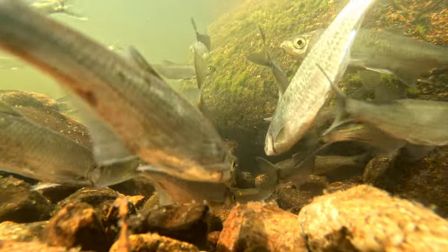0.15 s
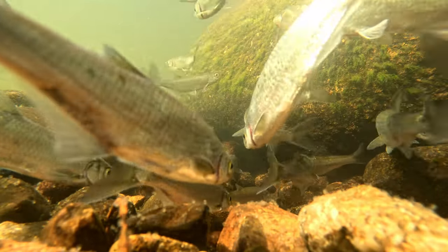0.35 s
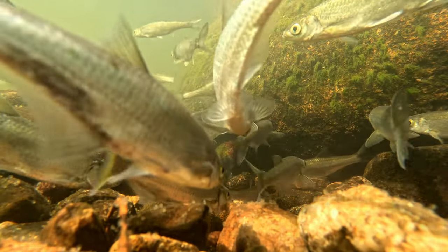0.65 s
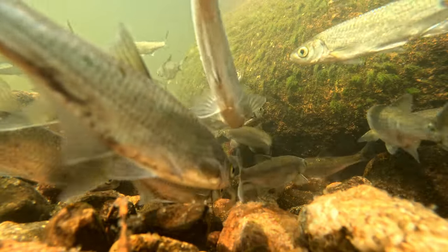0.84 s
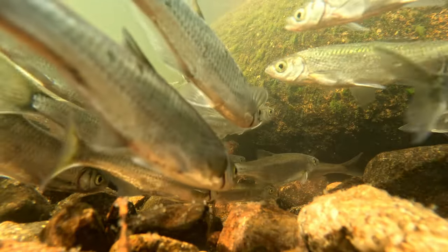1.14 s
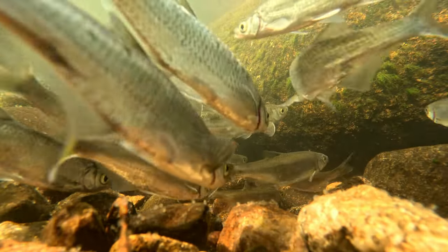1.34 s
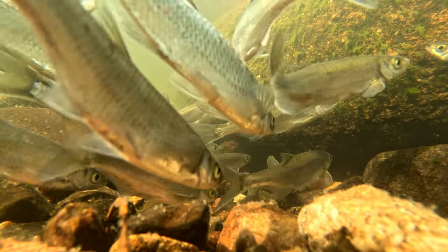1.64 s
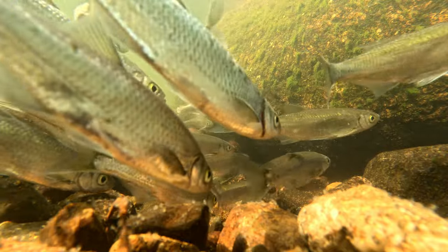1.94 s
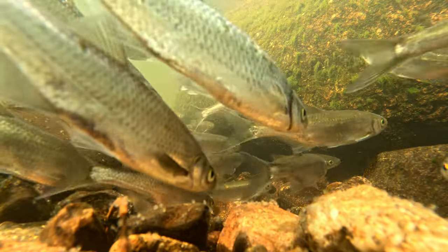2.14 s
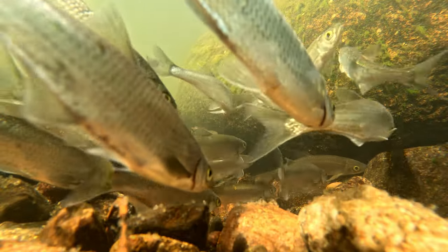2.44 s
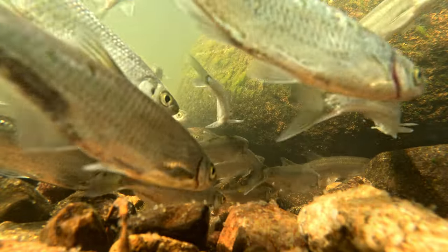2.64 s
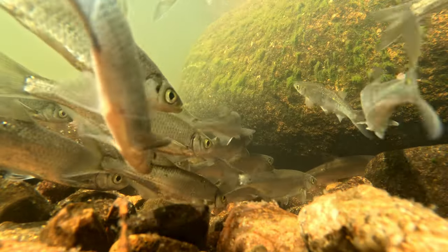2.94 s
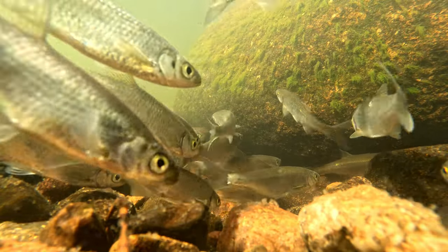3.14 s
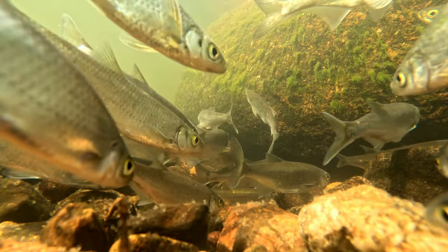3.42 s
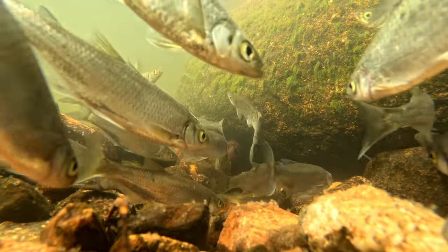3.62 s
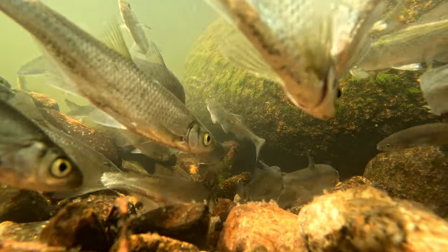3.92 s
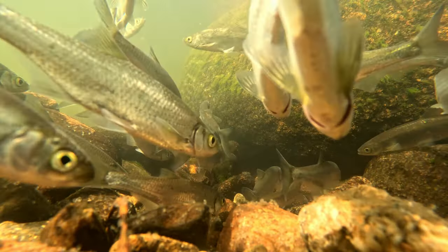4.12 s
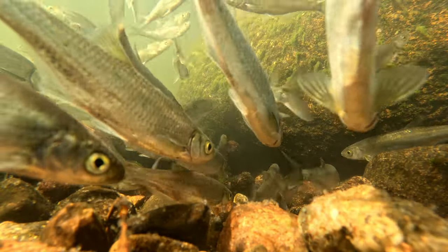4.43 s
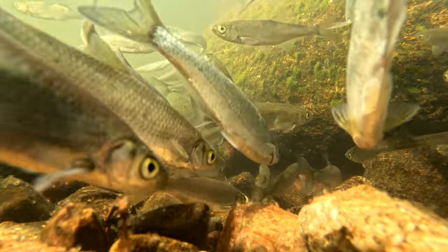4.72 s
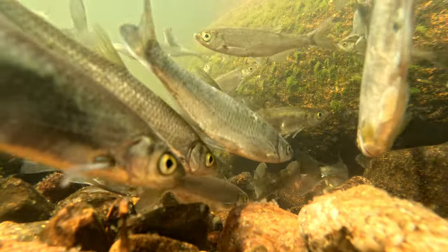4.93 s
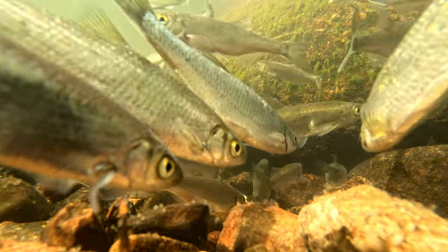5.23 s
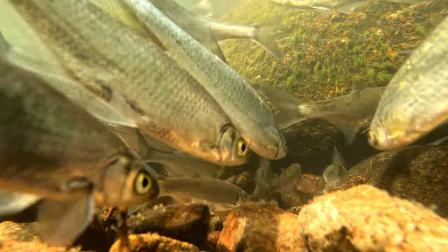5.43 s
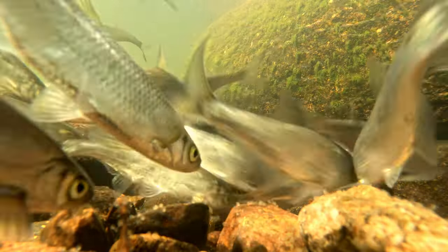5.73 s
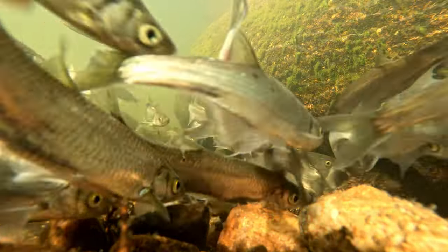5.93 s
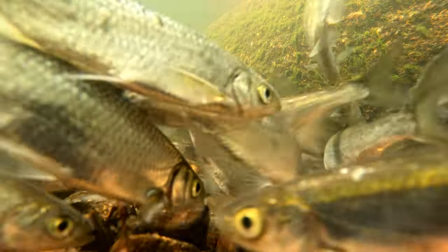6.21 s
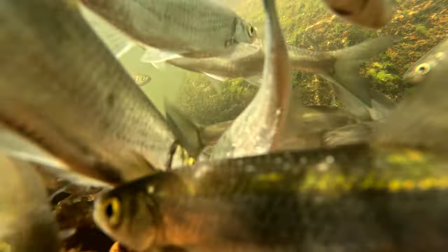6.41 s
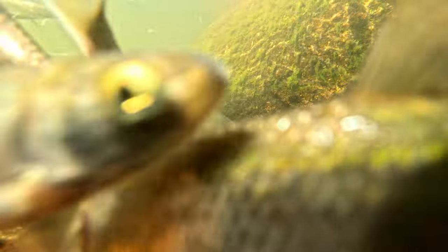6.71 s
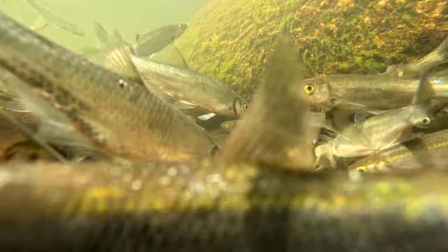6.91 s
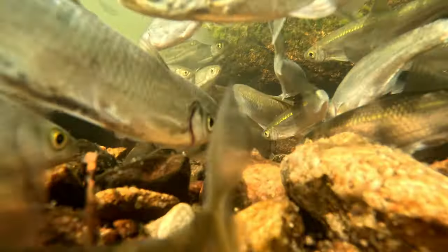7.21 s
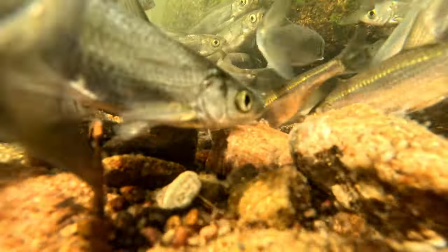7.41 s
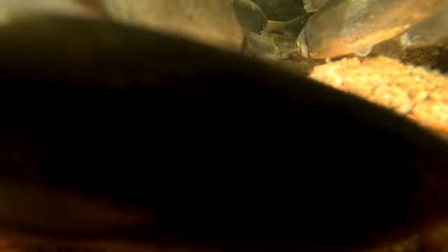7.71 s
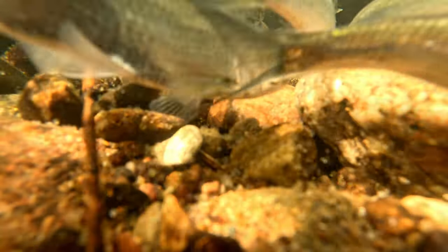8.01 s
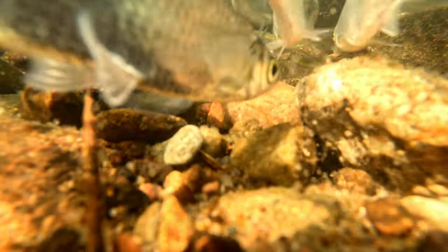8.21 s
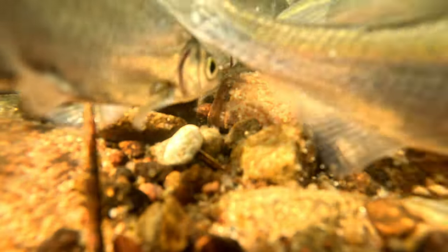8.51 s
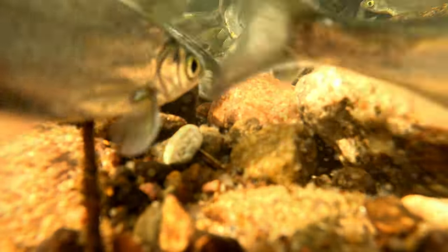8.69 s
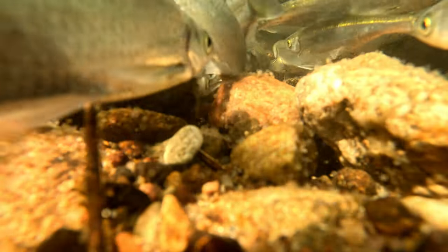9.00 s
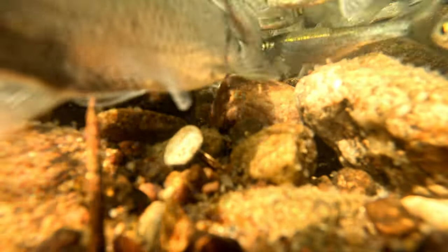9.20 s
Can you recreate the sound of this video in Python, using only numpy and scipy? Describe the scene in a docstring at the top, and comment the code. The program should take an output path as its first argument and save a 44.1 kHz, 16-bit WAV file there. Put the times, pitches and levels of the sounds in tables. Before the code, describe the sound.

Underwater, muffled bumps and soft rubs over a low hum build into a crowded burst of heavy thuds, scrapes and gritty clicks against a small housing.

```python
"""Underwater camera among fish

A small camera lies on a stony river bed among a shoal of fish. Current and passing bodies press on its
housing as slow random pressure and short swings; fins and grit rub and knock it, exciting its resonances.
Bright ticks, one bubble gurgle, a low hum, a faint picture-rate buzz and a river hiss complete the scene.
The loudest blows overload the input, and a quick limiter holds the peaks.
"""
import sys
import numpy as np
from scipy import signal
from scipy.fft import rfft, irfft, next_fast_len
from scipy.io import wavfile
from scipy.ndimage import uniform_filter1d, minimum_filter1d, map_coordinates

SR = 44100
rng = np.random.default_rng(int(sys.argv[2]) if len(sys.argv) > 2 else 0)


def dump(signal):
    """Clip the signal to [-1, 1] and save it as 16-bit WAV at the path in sys.argv[1]."""
    limited = np.clip(np.atleast_2d(signal).T, -1, 1)
    pcm = np.round(limited * 32767).astype(np.int16)
    wavfile.write(sys.argv[1], SR, pcm)


N = 412335

# housing resonances, which act twice: [f/Hz, width/Hz, level per pass/dB]
LID = [(577, 150.2, 7), (278, 139, -6)]
WINDOW = [(1678, 490, 2.5), (820, 1080, -3)]
FRAME = [(2582, 280, 10)]
RIM_MODES = [(3426, 1500, 3.5), (5300, 510, -4), (6940, 1400, 4)]
# vibrating parts, lid, window, frame and rim: [resonances, f/Hz above which the water damps the part]
PARTS = [(LID, 1950), (WINDOW, 2100), (FRAME, 3000), (RIM_MODES, 4300)]
FIRM_DB = -39  # frame level of a firm touch


def amp(db):
    """Level to amplitude: 20 dB is a factor of ten."""
    return 10 ** (np.asarray(db) / 20)


def unit(x):
    """Normalization to unit root-mean-square value."""
    return x / np.sqrt(np.mean(x ** 2) + 1e-20)


def along(points, hz):
    """Interpolation of each column after the frequency on a logarithmic frequency axis."""
    f, *columns = np.transpose(points)
    return [np.interp(np.log(hz + 1), np.log(f + 1), column) for column in columns]


def curves(rows):
    """Linear interpolation in time: one value per sample for each column after the time."""
    s, *columns = np.transpose(rows)
    return [np.interp(np.arange(N) / SR, s, column) for column in columns]


def wobble(rate):
    """Band-limited random modulation: a smooth curve through `rate` random knots a second."""
    knots = rng.standard_normal(int(N * rate / SR) + 4)
    return map_coordinates(knots, [np.arange(N) * rate / SR])


def filtered(x, response):
    """Linear filtering: the spectrum of x, mirrored past its end, times a response of frequency."""
    m = next_fast_len(N + SR // 2)
    longer = np.concatenate([x, x[..., -2:-SR // 10:-1]], axis=-1)
    spectrum = rfft(longer, m) * response(np.fft.rfftfreq(m, 1 / SR))
    return irfft(spectrum, m)[..., :N]


def ringing(x, modes, dull_hz, tuning=1):
    """Modal superposition, passed twice (wall, then air space) and damped above dull_hz."""
    def bank(f):
        total = 0
        for k, (centre, width, db) in enumerate(modes):
            damping = 1j * f * width
            mode = damping / ((centre * tuning) ** 2 - f * f + damping)
            # alternate signs fill the gaps between neighbouring resonances
            total = total + (-1) ** k * amp(db) * mode
        return total

    def response(f):
        water_loss = (1 + np.sqrt(2) * 1j * f / dull_hz - (f / dull_hz) ** 2) ** 3
        return bank(f) ** 2 / water_loss

    # white noise keeps its level
    mean_gain = np.sqrt(np.mean(np.abs(response(np.arange(0, SR / 2, 10))) ** 2))
    return filtered(x, response) / mean_gain


def with_rim(part_db):
    """Level-dependent brightness: the rim follows the frame, gaining more in harder contact."""
    below_frame_db, growth = -7, .26  # growth in dB per dB above a firm touch
    rim_db = part_db[2] + below_frame_db + growth * (part_db[2] - FIRM_DB)
    return amp([*part_db, rim_db])


def housing():
    """Forced modal vibration: knocks and rubbing ring each part, its tuning shifting with the place touched."""
    shift, shifts_per_s = .038, 14  # fraction of each resonance frequency; random knots per second
    sound = 0
    for part, blow, rub in zip(PARTS, knocks(), rubbing()):
        force = blow + rub
        high = .5 + .5 * np.tanh(3.1 * wobble(shifts_per_s))
        sound = sound + ringing(high * force, *part, 1 + shift)
        sound = sound + ringing((1 - high) * force, *part, 1 - shift)
    return sound


def knocks():
    """Impact excitation: each knock is a decaying, slightly cushioned burst of contact force on every part."""
    # knocks, rated by the force on each part: [t/s, lid level/dB, window level/dB, frame level/dB]
    knock_rows = [(0.748, -22.5, -65, -75), (0.808, -16.5, -36, -55), (0.842, -15, -23, -56.5),
                  (1.572, -24.5, -27.5, -60), (1.62, -20.5, -43, -65), (1.784, -16.5, -26.5, -53.5),
                  (2.424, -21, -25, -47), (2.568, -32.5, -36.5, -77), (2.749, -3, -17, -38),
                  (3.119, -24.5, -31, -65), (3.812, -38, -43, -82), (3.83, -38, -46, -67),
                  (3.856, -27.5, -40.5, -71), (4.928, -16.5, -36.5, -74), (5.03, -30.5, -36.5, -76),
                  (5.068, -32, -47.5, -85), (5.092, -35.5, -36, -79), (5.112, -18.5, -50.5, -71),
                  (5.391, -3.5, -28.5, -65.5), (5.435, -1.5, -23, -82), (5.669, -6, -30.5, -73),
                  (5.804, -11, -30.5, -41.5), (5.896, -8.5, -31.5, -54), (5.911, -10.5, -36.5, -47),
                  (6.008, -18, -32.5, -62), (6.022, -4, -33, -62), (6.039, -4.5, -34.5, -59),
                  (6.041, -4.5, -31, -55.5), (6.067, -9, -34, -50), (6.132, -3.5, -28.5, -74),
                  (6.217, -0.5, -11, -64), (6.239, -8, -13.5, -46), (6.285, -3.5, -32.5, -70),
                  (6.322, -7.5, -21, -74), (6.365, -2, -17, -64), (6.456, -9, -51.5, -66),
                  (6.539, -20, -24.5, -68), (6.657, -2, -9.5, -40), (6.796, -13.5, -15, -39),
                  (6.823, 0.5, -0.5, -29), (6.847, -12.5, -10, -24), (6.855, -21, -13.5, -32),
                  (6.858, -20.5, -7, -31.5), (6.923, -7.5, -19.5, -21), (6.939, -10, -23.5, -34),
                  (6.966, -9.5, -15.5, -41), (6.991, -15.5, -12.5, -35.5), (7.035, -22.5, -14, -27.5),
                  (7.063, -18.5, -26, -50.5), (7.118, -24, -12.5, -35.5), (7.135, -15.5, -18, -56.5),
                  (7.164, -11, -26, -35.5), (7.186, -18.5, -17, -27), (7.248, -19.5, -28, -34),
                  (7.293, -8, -25, -38), (7.357, -1.5, -11.5, -15.5), (7.378, -15.5, -23.5, -36),
                  (7.411, -4, -37, -44), (7.46, -12.5, -24.5, -46), (7.49, -28, -26.5, -41),
                  (7.499, -12.5, -15.5, -24.5), (7.53, -25, -31.5, -41), (7.534, -15, -19.5, -35),
                  (7.546, -14, -21.5, -29.5), (7.565, -11.5, -24.5, -37), (7.579, -23, -24, -36),
                  (7.602, -14, -11.5, -31), (7.621, -22.5, -21.5, -44), (7.629, -28.5, -37, -45),
                  (7.653, 1, -22.5, -39.5), (7.667, -19.5, -18, -39), (7.68, -5.5, -20, -37),
                  (7.726, -29, -35.5, -47), (7.742, -27, -31, -53), (7.772, 9.5, -17, -24.5),
                  (7.816, -23.5, -33.5, -54), (7.855, -18, -22, -39), (7.875, -36, -30, -48),
                  (7.885, -28, -27, -49), (7.897, -20.5, -45, -48), (7.915, -21, -26.5, -41),
                  (7.937, -19.5, -30.5, -43), (8.012, -19, -35.5, -57), (8.072, -32, -45, -49.5),
                  (8.186, -26.5, -20, -31.5), (8.231, -16.5, -27.5, -43), (8.306, -8, -27.5, -50),
                  (8.354, -12.5, -52, -62), (8.398, -16.5, -31.5, -63), (8.439, -15.5, -21, -32.5),
                  (8.455, -14.5, -28.5, -46), (8.467, -19, -28, -42), (8.477, -15, -19.5, -34.5),
                  (8.509, -29, -30, -40.5), (8.565, -31.5, -33, -63), (8.727, -7.5, -32, -56.5),
                  (8.918, -6.5, -14.5, -52), (9.098, -19, -23.5, -44.5), (9.119, -23.5, -22, -42),
                  (9.136, -22, -24.5, -44), (9.164, -11.5, -23, -54)]
    contact_t60_s, level_span_s = .012, .0071  # decay; time over which a knock's level is taken
    bite_s = .0012  # from first touch to the hardest instant
    t = np.arange(SR // 50) / SR
    blows = np.zeros((len(PARTS), 2, N + len(t)))
    for s, *part_db in knock_rows:
        contact = rng.standard_normal((2, len(t))) * amp(-60 * t / contact_t60_s)
        contact[:, round(bite_s * SR)] = [8, 3]
        force = contact / np.linalg.norm(contact[0])
        start = round(s * SR)
        blows[..., start:start + len(t)] += with_rim(part_db)[:, None, None] * force
    cushioned = uniform_filter1d(blows[..., :N], size=5)
    return cushioned * np.sqrt(level_span_s * SR)


def rubbing():
    """Friction excitation: fins and grit drag in uneven clumps; light strokes swish, firm ones crackle."""
    grit_growth = .2  # dB of grains per dB of frame level above a firm touch
    grains, drag = grit(rate=190, spread_db=5.5, flutter_db=2.2)
    strengths = strokes()
    gritty = (strengths[2] / amp(FIRM_DB)) ** grit_growth
    forces = []
    for strength, drag_db in zip(strengths, (2.5, -4.0, -2.5, -5.0)):
        mix = gritty * unit(grains) + amp(drag_db) * unit(drag)
        mix = mix / np.hypot(gritty, amp(drag_db))
        forces.append(strength * unit(amp(1.5 * wobble(45)) * mix))
    return forces


def grit(rate, spread_db, flutter_db):
    """Random impulse (shot) noise of uneven grains, and smooth drag noise, fluttering together; two rows each."""
    size = amp(spread_db * np.minimum(rng.exponential(size=(2, N)), 2.5))
    grains = (rng.random((2, N)) < rate / SR) * size * rng.choice([-1, 1], (2, N))
    flutter = amp(flutter_db * (wobble(30) + wobble(80)))
    return flutter * np.array([unit(grains), rng.standard_normal((2, N))])


def strokes():
    """Power addition of independent sources: each stroke swells, holds and dies away over constant silt."""
    # strokes of fins and grit: [t/s, length/s, lid level/dB, window level/dB, frame level/dB]
    stroke_rows = [(0.209, 0.013, -40.5, -47, -73), (0.575, 0.023, -52.5, -49, -63),
                   (0.676, 0.11, -38.5, -66, -73), (0.78, 0.026, -26.5, -41, -74),
                   (1.584, 0.07, -30, -51.5, -68), (1.751, 0.011, -22, -32.5, -56),
                   (2.377, 0.035, -32.5, -65.5, -78), (2.552, 0.041, -27.5, -44, -65),
                   (2.703, 0.11, -24.5, -35.5, -64), (2.767, 0.12, -19, -42, -78),
                   (2.854, 0.13, -14.5, -36, -80), (2.985, 0.018, -23.5, -35, -51),
                   (2.99, 0.064, -22.5, -45, -73), (3.124, 0.062, -15.5, -36, -78),
                   (3.3, 0.086, -24, -40.5, -82), (3.425, 0.13, -19.5, -37.5, -79),
                   (3.79, 0.054, -31, -43.5, -72), (3.868, 0.11, -38.5, -50, -72.5),
                   (3.978, 0.11, -31, -47.5, -64), (4.16, 0.156, -40, -53.5, -68),
                   (4.324, 0.038, -18.5, -36.5, -50.5), (4.493, 0.045, -26, -36, -55),
                   (4.56, 0.078, -41, -64, -82), (4.627, 0.02, -24.5, -46, -52.5),
                   (4.679, 0.09, -37.5, -54, -61.5), (4.906, 0.077, -30, -44, -55),
                   (5.012, 0.029, -32, -38.5, -74.0), (5.064, 0.05, -32, -53, -74),
                   (5.207, 0.066, -29, -38, -85), (5.352, 0.031, -32, -41, -80.5),
                   (5.42, 0.076, -29, -45, -94), (5.514, 0.32, -30.5, -46, -87),
                   (5.745, 0.095, -8, -34, -75.5), (5.87, 0.15, -9.5, -32, -66.5),
                   (6.07, 0.1, -19.5, -41, -86), (6.18, 0.16, -17, -39.5, -72),
                   (6.381, 0.27, -22.5, -43, -94), (6.502, 0.092, -16.5, -34.5, -60),
                   (6.595, 0.064, -12.5, -33.5, -54.5), (6.702, 0.15, -28, -36, -79),
                   (6.775, 0.048, -24, -23.5, -47), (6.829, 0.052, -21.5, -24.5, -34.5),
                   (6.888, 0.038, -25.5, -15, -28), (7.049, 0.088, -27, -26, -41.5),
                   (7.111, 0.06, -17.5, -25.5, -47), (7.171, 0.055, -16, -25.5, -37),
                   (7.236, 0.055, -9.5, -20, -38.5), (7.318, 0.069, -12.5, -26.5, -40),
                   (7.392, 0.067, -15, -30, -42), (7.509, 0.057, -23, -33, -46.5),
                   (7.553, 0.051, -19, -33, -50), (7.642, 0.093, -25, -36, -50.5),
                   (7.767, 0.057, -38.5, -52, -76), (7.863, 0.14, -30.5, -41.5, -58.5),
                   (7.953, 0.047, -18.5, -45.5, -64), (8.044, 0.088, -25.5, -43, -60.5),
                   (8.151, 0.097, -18.5, -41, -57), (8.265, 0.072, -12.5, -32.5, -49.5),
                   (8.371, 0.046, -22.5, -43.5, -59), (8.421, 0.14, -24.5, -42.5, -59),
                   (8.577, 0.1, -27.5, -48, -84), (8.673, 0.11, -21, -45, -73),
                   (8.799, 0.027, -18.5, -40, -50.5), (8.868, 0.055, -19, -41.5, -61),
                   (8.979, 0.05, -20, -36, -58.5), (9.047, 0.15, -11, -28.5, -49),
                   (9.212, 0.18, -13.5, -28.5, -49)]
    # silt drifting past all the time: [lid level/dB, window level/dB, frame level/dB]
    silt_db = (-44, -66, -81.5)
    attack_s, release_s = .016, .05
    t = np.arange(N) / SR
    power = with_rim(silt_db)[:, None] ** 2 * np.ones(N)
    for s, length, *part_db in stroke_rows:
        end = s + length + release_s
        near = slice(max(round(s * SR), 0), round(end * SR))
        rise, fall = (t[near] - s) / attack_s, (end - t[near]) / release_s
        shape = np.clip(np.minimum(rise, fall), 0, 1)
        power[:, near] += (with_rim(part_db)[:, None] * shape) ** 2
    return np.sqrt(power)


def shoves():
    """Transient pressure swings: bodies shove the housing, each wave packet rising faster than it fades."""
    # shoves and bumps: [t/s, envelope peak level/dB, f/Hz]
    shove_rows = [(0.713, -11, 84.8), (0.808, -10, 72.2), (0.858, -6.5, 140), (1.631, -9, 56.6),
                  (1.78, -12.5, 282), (1.788, -5.5, 44.2), (1.669, -15, 42.5), (1.823, -12.5, 44),
                  (2.207, -22, 60.3), (2.595, -15, 63.2), (2.745, -7.5, 315), (2.747, -3, 71.2),
                  (2.802, -8.5, 56.6), (3.001, -14, 61.5), (3.2, -16, 46.2), (4.414, -14, 51.2),
                  (4.66, -9.5, 81), (5.305, -13.5, 267), (5.408, -7, 82), (5.449, -4, 212.4),
                  (5.683, -10, 134.7), (5.765, -9, 360), (5.771, -3, 153.7), (6.033, -20.5, 136),
                  (6.042, -1.5, 333.5), (6.129, -8.5, 124.2), (6.224, -8.5, 96.2), (6.262, -2.5, 119.3),
                  (6.296, 0.5, 103.2), (6.376, -5, 139.2), (6.544, -9.5, 111.5), (6.648, -6, 94.4),
                  (6.663, 5.5, 349), (6.672, -2.5, 132.4), (6.824, -14, 83), (6.855, -10, 130),
                  (6.93, -19, 107), (6.967, 7, 350), (7.087, -6, 50.5), (7.124, -1.5, 322),
                  (7.301, -10.5, 98.3), (7.418, 3.5, 289), (7.61, -30.5, 155), (7.687, -1.5, 314),
                  (8.011, -7.5, 341), (8.211, -13, 122), (8.319, -9, 69.8), (8.727, -10.5, 89.6),
                  (8.851, -7.5, 349), (8.862, -11.5, 76.5), (8.946, -10.5, 98), (9.077, -9.5, 99.7),
                  (9.197, -8.5, 116)]
    t = np.arange(-SR // 20, SR // 10) / SR
    out = np.zeros((2, N + SR // 4))
    for s, db, hz in shove_rows:
        turns = hz * t
        life = np.where(t < 0, .055, .09) * np.sqrt(hz)  # in cycles: higher shoves swing more often
        swing = np.cos(2 * np.pi * (turns + rng.random())) * np.exp(-(turns / life) ** 2)
        start = round(s * SR) - SR // 20
        out[:, start:start + len(t)] += amp(db) * swing * [[1], [rng.standard_normal()]]
    return out[:, :N]


def surge():
    """Turbulent pressure fluctuation: current and the wash of passing fish press on the housing."""
    # low pressure of moving water: [t/s, level/dB]
    wash = [(0, -38.5), (.8, -28), (1.1, -38.5), (1.7, -31), (2.2, -34.5), (2.8, -30), (4.4, -30.5),
            (4.8, -31), (5.45, -25.5), (5.62, -43), (5.77, -10), (6.05, -12.5), (6.6, -17.5), (6.74, -26.5),
            (6.88, -7), (7.06, -20), (7.39, -11), (7.85, -22), (8.32, -17.5), (8.63, -28), (8.77, -13.5),
            (9.02, -16), (9.35, -15)]
    # spectral density of that pressure: [f/Hz, relative level/dB per Hz]
    push = [(8.8, -37.5), (15, 1.5), (54, 0), (141, -5), (222, -8.5), (400, -21), (520, -22.5), (880, -120)]
    noise = filtered(rng.standard_normal((2, N)), lambda hz: amp(along(push, hz)[0]))
    lumps = amp(3 * wobble(18))
    return amp(curves(wash)[0]) * unit(noise * lumps)


def ticks():
    """Broadband impact radiation: hard contact gives sharp, ragged noise bursts of a few milliseconds."""
    # thin bright ticks: [t/s, nominal level/dB]
    tick_rows = [(2.7524, -39.5), (5.804, -46), (5.899, -50), (6.008, -54.5), (6.0225, -52), (6.0385, -51),
                 (6.068, -45), (6.2163, -45.5), (6.2491, -48), (6.369, -49), (6.625, -48), (6.6588, -31),
                 (6.666, -30), (6.824, -29.5), (6.8302, -32.5), (6.847, -32), (6.861, -29), (6.8935, -38),
                 (6.923, -32.5), (6.964, -42.5), (7.1628, -45.5), (7.1868, -57), (7.3568, -24.5),
                 (7.6527, -37.5), (7.6804, -40.5), (8.0107, -50), (8.188, -51.5), (8.307, -47),
                 (8.4397, -49), (8.4771, -57), (9.195, -48.5)]
    # spectral colour of a tick: [f/Hz, relative level/dB per Hz]
    tick_colour = [(1200, -57.5), (2600, -3.5), (4500, -8), (7000, -10), (11000, -21.5), (16000, -40.5)]
    tick_t60_s = .0073
    colour = lambda hz: amp(along(tick_colour, hz)[0])
    t = np.arange(SR // 200) / SR
    spikes = np.zeros((2, N))
    for s, db in tick_rows:
        burst = rng.standard_normal((2, len(t))) * amp(-60 * t / tick_t60_s)
        start = round(s * SR)
        # the 11.5 dB makes up for energy spread over the burst
        spikes[:, start:start + len(t)] += amp(db + 11.5) * burst / np.linalg.norm(burst[0])
    impulse_peak = filtered(signal.unit_impulse(N, SR), colour).max()
    return filtered(spikes, colour) / impulse_peak


def bubble():
    """Frequency and amplitude modulation: air squeezed from a gap gurgles, swelling as its pitch rises."""
    # the gurgle: [t/s, length/s, nominal level/dB, first f/Hz, last f/Hz]
    gurgle = (4.48, .085, -22, 360, 1400)
    s, length, db, first_hz, last_hz = gurgle
    u = np.clip((np.arange(N) / SR - s) / length, 0, 1)
    hz = first_hz * (last_hz / first_hz) ** u * (1 + .28 * wobble(250))
    turns = np.cumsum(hz) / SR
    swell = amp(db + 6.8 * wobble(120)) * np.sin(np.pi * u) ** 2
    return swell * np.sin(2 * np.pi * turns) * [[1], [0]]


def hum():
    """Additive synthesis: low tones waver slightly in pitch and strength until the camera is jolted."""
    # tones: [f/Hz, level relative to the hum level/dB]
    tone_rows = [(150.7, -10.5), (213.2, -2), (301, -20), (426.4, -19)]
    hum_db, stops_s, fade_s = -30.5, 5.75, .08  # the fade falls 60 dB in fade_s
    t = np.arange(N) / SR
    drift = np.cumsum(.00037 * wobble(3.2)) / SR  # shared time drift, in seconds
    tones = 0
    for hz, db in tone_rows:
        tones = tones + amp(db + 1.3 * wobble(6)) * np.sin(2 * np.pi * hz * (t + drift))
    fade_db = -60 * np.maximum(t - stops_s, 0) / fade_s
    return amp(hum_db + fade_db) * tones * [[1], [0]]


def buzz():
    """Periodic impulse excitation: one soft, resonant tick for every picture taken."""
    # resonances, which act twice: [f/Hz, width/Hz, level per pass/dB]
    buzz_modes = [(1300, 180, 6), (1972, 130, 4.5), (2537, 140, 3.5), (3720, 220, -9), (4360, 170, -8.5),
                  (6550, 120, -5)]
    pictures_per_s = 59.94
    pulses = np.zeros((2, N))
    times = np.arange(int(N / SR * pictures_per_s)) / pictures_per_s + .002
    at = np.round(times * SR).astype(int)
    pulses[:, at] = amp(1.2 * rng.standard_normal((2, len(at))))
    return amp(-62.0) * unit(ringing(pulses, buzz_modes, dull_hz=11900))


def current():
    """Stationary coloured noise: the far hiss of the river."""
    # spectral density of the hiss: [f/Hz, relative level/dB per Hz]
    hiss = [(600, -42.5), (850, -17.5), (1150, -9), (1500, 2.5), (1950, -10.5), (2200, -29), (2540, -7.5),
            (3000, -25.5), (4300, -29), (5200, -32.5), (6500, -28.5), (7700, -34), (8300, -60.5),
            (9500, -120)]
    noise = filtered(rng.standard_normal((2, N)), lambda hz: amp(along(hiss, hz)[0]))
    return amp(-59.0) * unit(noise)


def ports(pair):
    """Partial coherence: the right port hears row 0, the left a tilted, turned mix of both rows."""
    # left port against right: [f/Hz, level/dB, phase lead/rad, likeness 0-1]
    port_rows = [(60, -.5, 0, .92), (200, -1, 0, .72), (330, -5, .6, .75), (600, -12, 1.3, .93),
                 (730, -16, 2.9, .4), (870, -8, 4.7, .8), (1200, -3, 4.7, .92), (1550, 1.5, 4.7, .99),
                 (2500, 3, 4.7, .8), (3500, 5, 4.7, .75), (5000, 4, 5.2, .6), (8000, -2, 6.2, .65),
                 (12000, -6, 6.2, .7)]

    def left(hz):
        db, ahead, alike = along(port_rows, hz)
        alike = np.clip(alike, 0, 1)
        return amp(db) * np.exp(1j * ahead) * [alike, np.sqrt(1 - alike ** 2)]

    return np.array([filtered(pair, left).sum(0), pair[0]])


def scene():
    """Linear superposition of all sources, heard at the two ports."""
    contact = housing() + ticks()
    water = shoves() + surge() + bubble() + current()
    return ports(contact + water + hum() + buzz())


def record(dry):
    """Soft saturation, then peak limiting and band limiting: overloads are rounded and peaks held down."""
    overload_db, ceiling, top_hz = 6.5, .95, 16500  # dB over full scale; peak aimed at; band limit in Hz
    x = dry / (1 + np.abs(dry / amp(overload_db)) ** 8) ** (1 / 8)
    needed = ceiling / np.maximum(np.abs(x).max(0), ceiling)
    gain = uniform_filter1d(minimum_filter1d(needed, size=300), size=280) ** .96
    return np.clip(filtered(x * gain, lambda hz: hz < top_hz), -1, 1)


dry = scene()
out = record(dry)
dump(out)
```